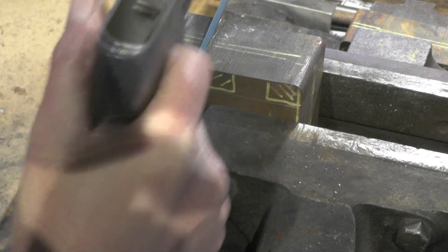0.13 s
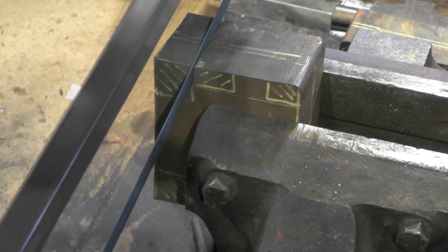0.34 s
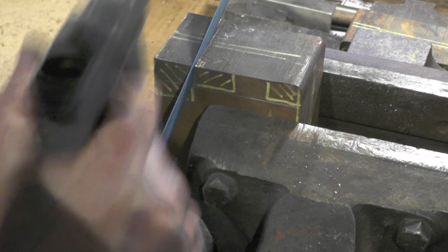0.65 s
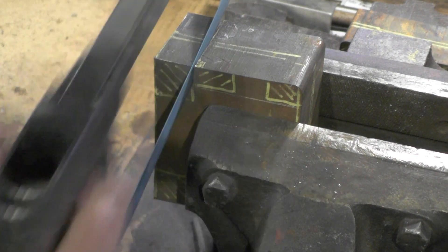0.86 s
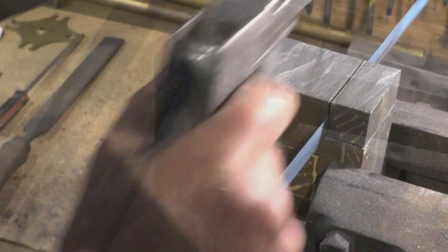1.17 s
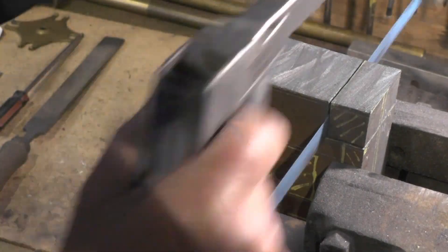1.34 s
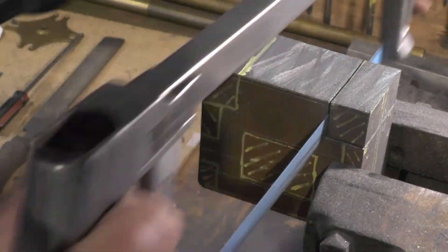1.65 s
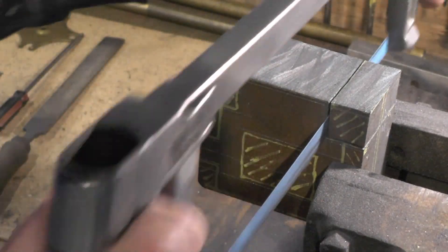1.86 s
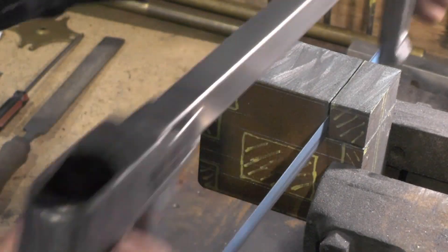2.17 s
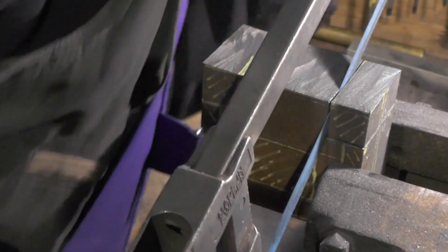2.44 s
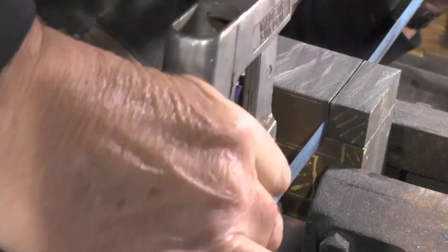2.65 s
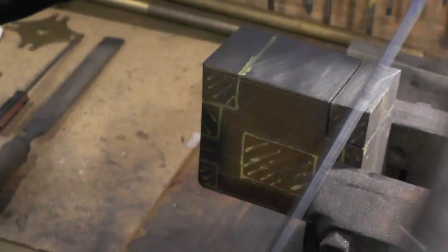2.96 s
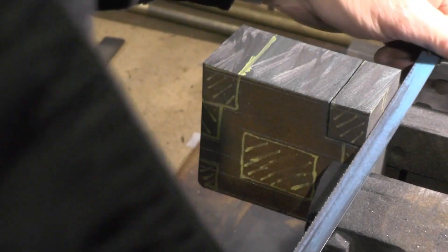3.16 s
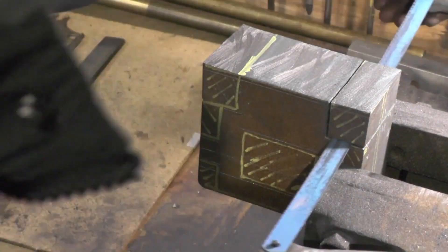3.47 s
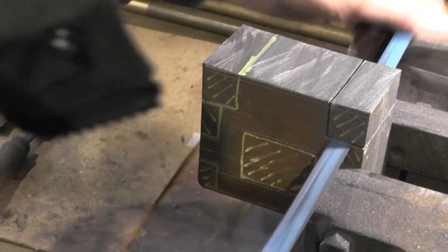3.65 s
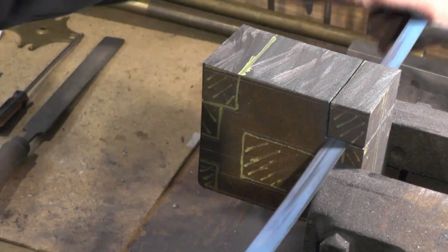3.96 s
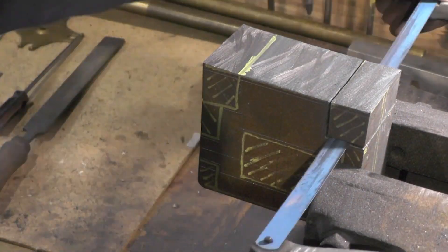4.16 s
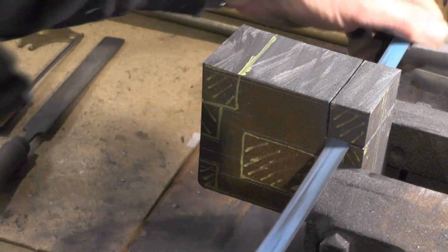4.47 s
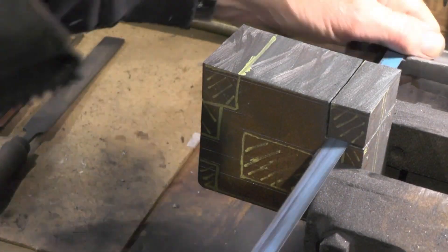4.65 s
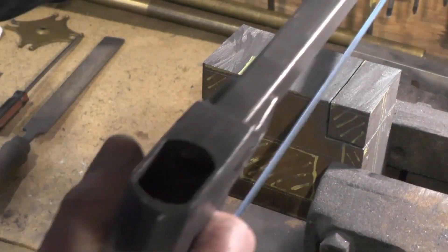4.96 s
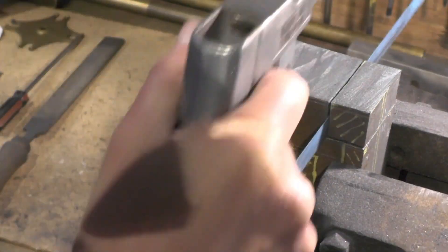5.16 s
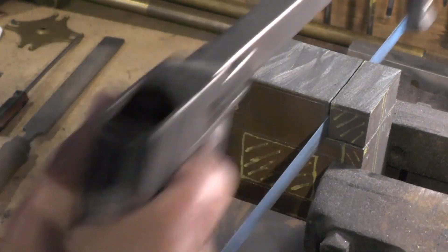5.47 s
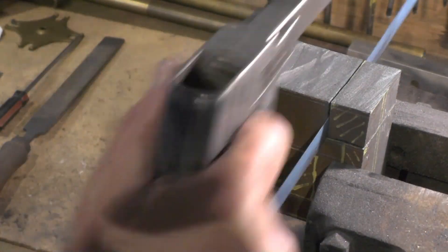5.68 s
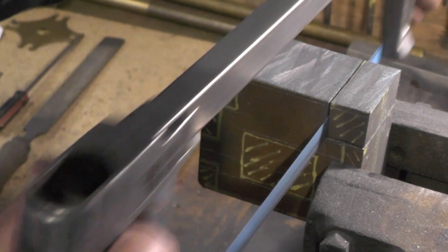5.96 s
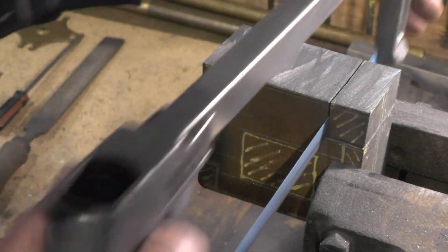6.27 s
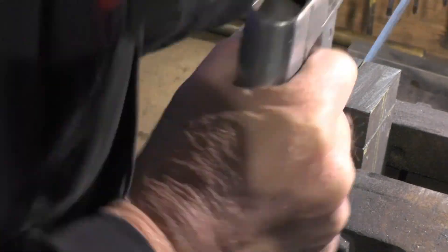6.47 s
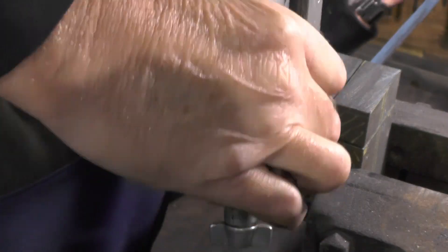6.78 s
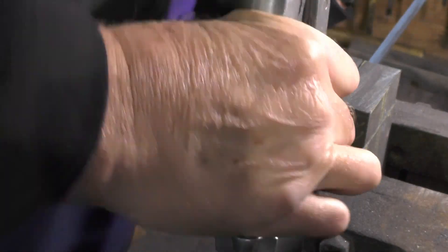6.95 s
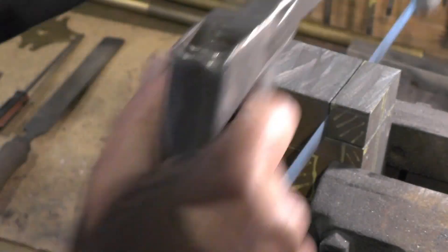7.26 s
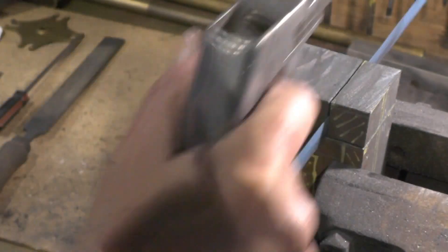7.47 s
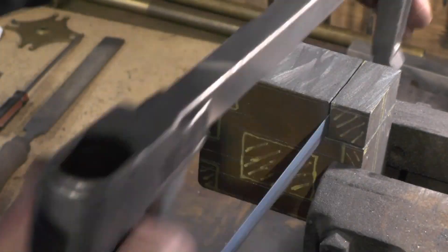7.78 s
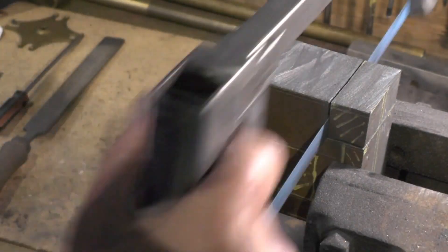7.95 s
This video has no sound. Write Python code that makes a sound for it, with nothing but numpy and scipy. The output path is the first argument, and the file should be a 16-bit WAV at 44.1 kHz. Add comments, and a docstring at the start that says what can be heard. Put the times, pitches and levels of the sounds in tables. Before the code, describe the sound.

Close stereo microphone in a workshop, saw toward the right. Several slow hacksaw strokes on iron rasp and whistle, then everything drops silent. Rapid sawing starts abruptly, hissy and chattering with a ringing steel frame. It stops; the blade is repositioned with scrapes and ticks, saws evenly with a different metallic colour, then resumes fully. After a pause with a tiny sliding squeak, one hard stroke leads into steady sawing to the end.

```python
"""Hacksaw on cast iron

A hand hacksaw cuts a cast iron block in a workshop vise, close to the right port of a stereo microphone.
Slow strokes fade to a short silence; then quick strokes come in bouts with short pauses, and in one pause
the resting blade squeaks. Random chips and hiss make the rasp, resonances make the frame ring,
and sines at the rate of passing teeth make the beats and whistles. Knocks are damped tones with a tick;
the shop behind is filtered noise with a low hum and two drones."""
import sys
import numpy as np
from scipy import signal
from scipy.fft import rfft, irfft, next_fast_len
from scipy.io import wavfile
from scipy.ndimage import uniform_filter1d

SR = 44100
rng = np.random.default_rng(int(sys.argv[2]) if len(sys.argv) > 2 else 0)


def dump(signal):
    """Clip the signal to [-1, 1] and save it as 16-bit WAV at the path in sys.argv[1]."""
    limited = np.clip(np.atleast_2d(signal).T, -1, 1)
    pcm = np.round(limited * 32767).astype(np.int16)
    wavfile.write(sys.argv[1], SR, pcm)


N = 358071
T = np.arange(N) / SR  # s
SIZE = next_fast_len(N)
HZ = np.fft.rfftfreq(SIZE, 1 / SR)
BACK_START, BACK_END = 3.0, 5.05  # s, the saw is worked from the back of the block
BACK = (T > BACK_START) & (T < BACK_END)


# slow strokes, push and pull in turn: (start [s], fastest [s], stop [s], rasp level [dB],
# frame ring level [dB], ring drift over a stroke length [dB], teeth passing at top speed [Hz])
SLOW_STROKES = [(-.14, .0, .13, -19.5, -28.5, 0, 788), (.16, .3, 0.47, -22.5, -20, 7, 618),
                (.47, .612, .73, -23, -25, -38.5, 832), (.78, .86, 0.95, -34, -37, 3, 466)]
EASE_DB = -8  # the hand eases off through a slow stroke
RASP_POWER, RING_POWER, TEETH_POWER, WHISTLE_POWER = 1.16, 1.4, .85, 2.7  # exponents on blade speed
IDLE_HZ = 249.3  # tooth rate at the slow strokes' ends and between strokes
WHISTLE_DB = (-16, -36)  # push and pull
WHISTLE_HZ, WHISTLE_WIDTH_HZ = 850, 45  # the blade's lowest resonance


def slow_strokes():
    """The speed of the blade sets rasp, ring, rate of teeth and their whistle."""
    gains = np.zeros((2, N))  # rasp, ring
    tooth_hz = np.full(N, float(IDLE_HZ))
    whistle = np.zeros(N)
    for k, (start, top, stop, rasp_db, ring_db, drift_db, top_hz) in enumerate(SLOW_STROKES):
        on = (T >= start) & (T < stop)
        speed = np.sin(np.pi / 2 * np.interp(T[on], [start, top, stop], [0, 1, 0]))
        along = (T[on] - top) / (stop - start)
        gains[0, on] = gain_of(rasp_db + EASE_DB * along) * speed ** RASP_POWER
        gains[1, on] = gain_of(ring_db + drift_db * along) * speed ** RING_POWER
        tooth_hz[on] = np.maximum(top_hz * speed ** TEETH_POWER, IDLE_HZ)
        detuning = (tooth_hz[on] - WHISTLE_HZ) / WHISTLE_WIDTH_HZ
        resonance = 1 / np.sqrt(1 + detuning ** 2)
        whistle[on] = gain_of(WHISTLE_DB[k % 2]) * speed ** WHISTLE_POWER * resonance
    return gains, tooth_hz, whistle


# quick strokes in bouts; each bout opens with a push, then pull and push take turns:
# (start [s], rasp level [dB], frame ring level [dB]), levels before the swell is shaped
QUICK_BOUTS = [
    [(1.194, -30.5, -28), (1.238, -28.5, -22), (1.304, -23, -23), (1.378, -24.5, -19), (1.44, -25.5, -25.5),
     (1.512, -24.5, -21), (1.579, -22.5, -20.5), (1.644, -23, -21), (1.711, -26, -26), (1.776, -29, -26),
     (1.835, -26.5, -21), (1.893, -26, -24.5), (1.932, -26, -25.5), (1.977, -38, -35), (2.012, -28, -23.5),
     (2.052, -35.5, -42), (2.087, -32, -28), (2.123, -29.5, -28.5), (2.166, -25.5, -21),
     (2.205, -36.5, -35), (2.247, -29.5, -21.5), (2.288, -30, -25), (2.331, -21.5, -21.5)],
    [(2.44, -67, -66), (2.66, -60, -55)],
    [(3.035, -29, -22)],
    [(3.185, -39.5, -59), (3.205, -36, -40), (3.242, -38.5, -41), (3.308, -31, -37.5)],
    [(3.418, -49, -61)],
    [(3.464, -23, -37), (3.516, -24, -30.5), (3.573, -19.5, -25), (3.622, -21, -28.5), (3.684, -20, -30),
     (3.738, -26.5, -32.5), (3.8, -22.5, -30), (3.858, -21.5, -27), (3.915, -25.5, -31),
     (3.98, -25.5, -27.5), (4.039, -22.5, -22.5), (4.094, -37, -43), (4.154, -29.5, -34),
     (4.215, -26.5, -33), (4.269, -23.5, -31), (4.33, -23, -34), (4.387, -24.5, -26), (4.45, -23.5, -35),
     (4.502, -24.5, -34), (4.56, -24, -31.5), (4.609, -28, -31.5), (4.664, -26.5, -34.5), (4.708, -27, -39),
     (4.762, -27.5, -28.5), (4.813, -23.5, -30), (4.87, -24, -29.5), (4.92, -23.5, -35)],
    [(5.112, -35, -35.5), (5.143, -30.5, -22), (5.166, -28.5, -30.5)],
    [(5.242, -24, -21), (5.314, -23, -23.5), (5.387, -24, -21.5), (5.455, -22, -21.5), (5.52, -24, -21.5),
     (5.586, -23.5, -18.5), (5.65, -23, -26), (5.717, -23, -23), (5.773, -23.5, -24), (5.836, -25.5, -21.5),
     (5.899, -24.5, -21.5), (5.959, -22, -24), (6.021, -21.5, -22), (6.079, -27, -26), (6.135, -23, -21),
     (6.19, -28.5, -24.5), (6.238, -21.5, -18), (6.277, -23, -24.5), (6.32, -23, -24.5), (6.363, -31, -29),
     (6.41, -23.5, -20.5), (6.481, -29.5, -31.5)],
    [(6.6, -68.5, -56)],
    [(6.785, -60, -48.5), (6.815, -56, -46)],
    [(7.234, -19, -30.5)],
    [(7.379, -23, -20.5), (7.452, -21.5, -25.5), (7.53, -23, -25), (7.6, -22.5, -24), (7.673, -23, -23.5),
     (7.745, -23.5, -21.5), (7.811, -22, -27), (7.884, -23, -23.5), (7.95, -23, -26), (8.02, -24.5, -20.5),
     (8.09, -22, -19.5)],
]
# where each bout stops: (time [s])
BOUT_STOPS = [2.39, 2.81, 3.115, 3.383, 3.45, 5.011, 5.23, 6.549, 6.73, 6.89, 7.351, 8.16]
PUSH_RISE, PULL_RISE = .33, .55  # share of a stroke spent speeding up
PUSH_RISE_S = .022  # a push never takes longer than this to bite


def strokes():
    """Gains of rasp and ring, and the rate of passing teeth, swell and die with the blade's speed."""
    gains, tooth_hz, whistle = slow_strokes()
    for bout, bout_stop in zip(QUICK_BOUTS, BOUT_STOPS):
        stops = [row[0] for row in bout[1:]] + [bout_stop]
        for k, ((start, *level_db), stop) in enumerate(zip(bout, stops)):
            length = stop - start
            pull = k % 2
            rise = PULL_RISE * length if pull else min(PUSH_RISE * length, PUSH_RISE_S)
            up = arch(rise, 0) ** 1.74
            down = arch(0, 1.003 * length - rise) ** 2.3
            first = int(start * SR)
            near = slice(first, min(first + len(up) + len(down), N))
            speed = np.r_[up, down][:near.stop - near.start]
            swell = np.tanh([[1.3], [1.6]] * speed)  # rasp, ring
            gains[:, near] += gain_of(level_db)[:, None] * swell
            tooth_hz[near] = rng.uniform(480, 700) * (.3 + .7 * np.sqrt(speed))
    # a short faint tail, the room's smear, follows each stroke
    decay = np.exp(-1 / (0.037 * SR))
    tail = signal.lfilter([1 - decay], [1, -decay], gains)
    return gains + 0.15 * tail, tooth_hz, whistle


def grit():
    """Chips of iron tear off at random: uneven clicks over a scraping hiss."""
    size = gain_of(3.2 * np.minimum(rng.exponential(1, N), 3.5))
    torn = rng.random(N) < 3000 / SR  # about 3000 chips a second
    chips = size * torn * rng.choice([-1, 1], N)
    return evened(0.58 * evened(chips) + rng.standard_normal(N))


# broad colour of the rasp: (frequency [Hz], relative level [dB])
RASP_COLOUR = [(150, -8.5), (400, -13), (1200, -12.5), (2000, -7.5), (6000, 2.5), (9000, 1.5), (13000, 4),
               (16000, 1)]
# blade and block resonances in the rasp: (frequency [Hz], width [Hz],
# level against the broad colour sawing from the front [dB], the same from the back [dB])
BLADE_MODES = [(827.5, 128, 22.5, 22.5), (1602, 157, 14.5, 19.5), (2309, 93, 9.5, 18), (2644, 54, 11, 13.5),
               (4540, 114.7, -17.5, 12.5), (5070, 75, 11, 8), (7760, 390, 4, -2)]
# loud modes of the saw frame: (frequency [Hz], width [Hz],
# relative level from the front [dB], relative level from the back [dB])
FRAME_MODES = [(3120, 200, -18.5, 24.5), (3333, 93, 5.5, -24), (3589, 47.4, 10, -15), (3610, 120, -18, 35)]
# heavy slow strokes also shake the block broadly: (frequency [Hz], width [Hz], level [dB])
BLOCK_SHAKE = [(2300, 810, 2)]


def sawing(gains, drive):
    """Grit and tooth beats excite the blade's colour and the frame's modes, which differ by stance."""
    rasp_gain, ring_gain = gains
    broad = gain_of(read(RASP_COLOUR))
    shake = modes(BLOCK_SHAKE, 0) / gain_of(BLOCK_SHAKE[0][2])
    scrape = colour((T < 1) * ring_gain * drive, shake)
    rung = 0
    for stance, on in enumerate([~BACK, BACK]):
        rasp = broad * np.sqrt(1 + modes(BLADE_MODES, stance))
        rasp /= np.sqrt(np.sum(rasp[HZ > 5500] ** 2) / len(HZ))  # level set by the treble
        ring = evened(broad * np.sqrt(modes(FRAME_MODES, stance)))
        scrape = scrape + colour(on * rasp_gain * drive, rasp)
        rung = rung + colour(on * ring_gain * drive, ring)
    return patchy(scrape) + gain_of(-1.5) * rung


def patchy(x):
    """The blade's free length and pressure keep changing, so its colour drifts in patches."""
    hz, _, z = signal.stft(x, SR, nperseg=512, noverlap=384)
    depth_db = 4.43 + 0.84 / (1 + (hz[:, None] / 3000) ** 2)  # deepest among the low blade modes
    patches = rng.standard_normal(z.shape[1:])
    patches = uniform_filter1d(patches, size=4, axis=0)  # across frequency
    patches = uniform_filter1d(patches, size=7, axis=1)  # across time
    z = z * gain_of(depth_db * evened(patches) - 0.17 * depth_db ** 2)
    return signal.istft(z, nperseg=512, noverlap=384)[1][:, :N]


# tooth whistles, where a quick stroke peaks near the blade's lowest resonance:
# (centre [s], level before a 3.5 dB lift [dB], tooth rate before the glide [Hz])
WHISTLE_PEAKS = [(1.469, -31, 801.4), (1.603, -38, 759), (1.743, -32.5, 859), (1.952, -24.5, 860.3),
                 (2.026, -22.5, 841), (2.18, -24.5, 842), (2.262, -32, 854), (2.353, -32, 949),
                 (3.937, -26, 879), (4.175, -32, 879), (4.361, -34, 875), (4.402, -34.5, 845),
                 (4.516, -27.5, 885), (4.591, -36, 891), (4.623, -26.5, 868), (4.727, -25.5, 867),
                 (4.833, -25, 900), (5.546, -46, 834.4), (5.676, -29.5, 828.4), (5.798, -31.5, 880),
                 (6.047, -30, 898), (6.173, -25, 870), (6.296, -53, 878), (6.335, -21, 833.5),
                 (7.556, -29.5, 817.4), (7.704, -35, 829), (7.837, -31, 848), (7.976, -28.5, 790.6)]
OCTAVE_FRONT_DB, OCTAVE_BACK_DB = -12.5, -30  # the whistle's octave, by stance


def teeth(tooth_hz, level):
    """Evenly set teeth pass the cut: beats for the blade, and a near sine where they meet its resonance."""
    level, tooth_hz = level.copy(), tooth_hz.copy()
    for centre, peak_db, top_hz in WHISTLE_PEAKS:
        near = slice(int((centre - .018) * SR), int((centre + .018) * SR))
        u = (T[near] - centre) / 0.01
        level[near] = gain_of(peak_db + 3.5) * np.exp(-2.4 * u ** 2)
        tooth_hz[near] = top_hz * (1.02 - .12 * u ** 2)
    octave = gain_of(np.where(BACK, OCTAVE_BACK_DB, OCTAVE_FRONT_DB))
    turn = 2 * np.pi * np.cumsum(tooth_hz * (1 + .006 * flutter(120))) / SR
    beats = sum(np.cos(k * turn) / k ** 0.28 for k in range(1, 7))
    tone = np.sin(turn) + octave * np.sin(2 * turn)
    whistle = level * tone * gain_of(1.2 * flutter(250))
    return beats, np.sqrt(2) * whistle


# the blade knocks on the iron:
# (time [s], level before the ring and tick are scaled [dB], ring [Hz], ring's 60 dB decay [s])
BLADE_KNOCKS = [(3.189, -17.5, 2310, 0.025), (3.251, 2.5, 4170, 0.003), (3.634, -12, 4460, .01),
                (3.756, -9, 4530, 0.009), (3.9857, -10, 4446, 0.009), (4.1038, -5, 4460, 0.01),
                (3.063, -27, 330, 0.12), (4.985, -26.5, 292, 0.1)]


def knocks():
    """Each knock is a sharp tick of noise and a short decaying sine."""
    out, t = np.zeros(N), T[:5000]
    ticks = np.diff(rng.standard_normal((len(BLADE_KNOCKS), len(t) + 1)))
    for (start, db, hz, t60), tick in zip(BLADE_KNOCKS, ticks):
        ring = np.sin(2 * np.pi * hz * t) * gain_of(-60 * t / t60)
        tick = tick * gain_of(-60 * t / 0.0038)
        out[int(start * SR):][:len(t)] += gain_of(db) * (0.44 * ring + 0.11 * tick)
    return out


# the resting blade rubs: (start [s], length [s], level [dB], from [Hz], to [Hz])
BLADE_SQUEAK = 6.79, .085, -44, 1950, 1680


def squeak():
    """The resting blade rubs: a faint rough tone that slides down."""
    start, length, db, from_hz, to_hz = BLADE_SQUEAK
    along = np.clip((T - start) / length, 0, 1)
    slide = to_hz + (from_hz - to_hz) * (1 - along) ** 2
    hz = slide * (1 + 0.033 * flutter(60))
    swell = gain_of(db + 3 * flutter(100)) * np.sin(np.pi * along)
    return swell * np.sin(2 * np.pi * np.cumsum(hz) / SR)


# colour of the workshop air: (frequency [Hz], relative level [dB])
SHOP_COLOUR = [(25, -40), (230, -23.5), (800, -33), (1810, -40), (4000, -44), (7870, -50), (16000, -42.5)]
# low hum and two drones: (frequency [Hz], width [Hz], level against the air [dB])
HUM_AND_DRONES = [(96.4, 21.5, 26.5), (626, 57, 12.5), (1304, 120, 11)]
# left port's likeness to the right in the shop: (frequency [Hz], likeness [0 to 1])
SHOP_LIKENESS = [(60, 0.96), (130, 0.91), (380, 0.21), (2380, 0.25), (15000, 0.69)]
# left port's level against the right in the shop: (frequency [Hz], left - right [dB])
SHOP_BALANCE = [(60, -1.5), (240, -1.5), (950, -14), (3770, -18), (15000, -2.5)]
SHOP_DB = -43  # both ports averaged, before ducking and fade


def shop():
    """Room air with a wavering level, a low hum and two faint drones, all resonances on noise."""
    tone = gain_of(read(SHOP_COLOUR)) * np.sqrt(1 + modes(HUM_AND_DRONES, 0))
    right, unrelated = colour(rng.standard_normal((2, N)), tone)
    air = pair(right, unrelated, SHOP_LIKENESS, SHOP_BALANCE)
    return gain_of(SHOP_DB + 0.71 * flutter(700)) * air / np.sqrt(np.mean(air.mean(0) ** 2))


def ducking(saw):
    """Gain control on the shop: a loud saw pushes the gain down and it recovers in the pauses."""
    power_db = 10 * np.log10(abs(uniform_filter1d((saw ** 2).mean(0), 900)) + 1e-12)
    fall = T * 300.0  # held peaks fall by 300 dB a second
    held_db = np.maximum.accumulate(power_db + fall) - fall
    over_db = np.maximum(held_db + 38, 0)  # above a -38 dB threshold
    return gain_of(-.95 * uniform_filter1d(over_db, 800))


def pair(a, b, same, lean):
    """Two microphone ports: the left hears a share of the right's sound a, the rest is the unrelated b."""
    same = np.clip(read(same), 0, 1)
    lean = gain_of(read(lean) / 2)  # half the level difference on each port
    left = colour(a, same * lean) + colour(b, np.sqrt(1 - same ** 2) * lean)
    right = colour(a, 1 / lean)
    return np.array([left, right])


def gain_of(db):
    """Decibels to gain."""
    return 10 ** (np.asarray(db) / 20)


def evened(x):
    """Scales to rms 1."""
    return x / np.sqrt(np.mean(x ** 2) + 1e-20)


def read(points):
    """A (frequency [Hz], value) table at every frequency, on a log axis."""
    f, value = np.transpose(points)
    return np.interp(np.log(HZ + 1), np.log(f + 1), value)


def modes(table, stance):
    """Summed power gain of a set of resonances."""
    return sum(gain_of(2 * db[stance]) / (1 + (2 * (HZ - hz) / width) ** 2) for hz, width, *db in table)


def flutter(smooth):
    """Slow random wander of rms 1: noise averaged twice over `smooth` samples."""
    return evened(uniform_filter1d(uniform_filter1d(rng.standard_normal(N), smooth), smooth))


def colour(x, gain):
    """Filters by a gain at every frequency."""
    return irfft(rfft(x, SIZE) * gain, SIZE)[..., :N]


def arch(rise, fall):
    """A quarter sine up, a quarter cosine down, lengths in seconds."""
    up = np.linspace(0, 1, int(rise * SR))
    down = np.linspace(1, 0, int(fall * SR))
    return np.sin(np.pi / 2 * np.r_[up, down])


# left port's likeness to the right for the saw: (frequency [Hz], likeness [0 to 1])
SAW_LIKENESS = [(60, 0.2), (240, 0.17), (950, 0.76), (3770, 0.51), (15000, 0.66)]
# left port's level against the right for the saw: (frequency [Hz], left - right [dB])
SAW_BALANCE = [(60, -2.5), (150, 1.5), (380, -6.5), (950, -12), (2380, -8), (5980, -10.5), (15000, -1)]
# the shop fades out before the silence: (time [s], level [dB])
SHOP_FADE = [(.6, -1.5), (0.926, -25), (0.957, -60)]
SOUND_RETURNS = 1.1995  # s


def scene():
    """The saw close to the right port, the shop around it, and a short silence between slow and quick strokes."""
    gains, tooth_hz, level = strokes()
    beats, whistle = teeth(tooth_hz, level)
    # quick strokes from the front make the teeth beat on the blade
    front = (T > SOUND_RETURNS) & (T < BACK_START) | (T > BACK_END)
    catch = gain_of(1.21 * flutter(60) + 0.59 * flutter(250))  # the teeth catch unevenly
    drive = catch * (np.array([grit(), grit()]) + 0.23 * beats * front)
    clean = whistle + knocks() + squeak()
    right, other = sawing(gains, drive) + [clean, np.roll(clean, 8)]
    saw = pair(right, other, SAW_LIKENESS, SAW_BALANCE)
    fade_s, fade_db = np.transpose(SHOP_FADE)
    fade = np.where(T < 1, gain_of(np.interp(T, fade_s, fade_db)), 1)
    sounding = np.clip((fade_s[-1] - T) / 0.037, 0, 1) ** 4 + (T > SOUND_RETURNS)
    return (saw + shop() * ducking(saw) * fade) * sounding


EDGE_HZ = 15780  # top of the band


def record(dry):
    """Band limit: a steep low-pass filter at EDGE_HZ."""
    low_pass = signal.firwin(801, EDGE_HZ, window=("kaiser", 12), fs=SR)
    return signal.oaconvolve(dry, low_pass[None], "same")


dry = scene()
out = record(dry)
dump(out)
```